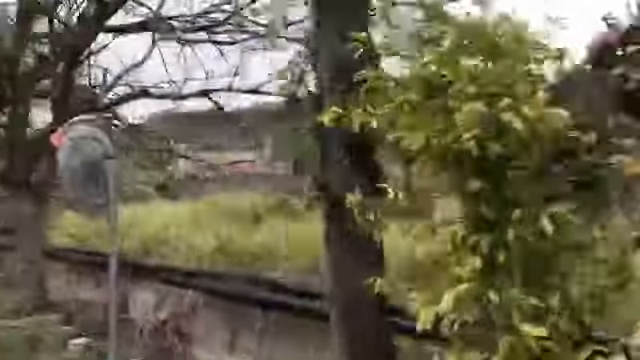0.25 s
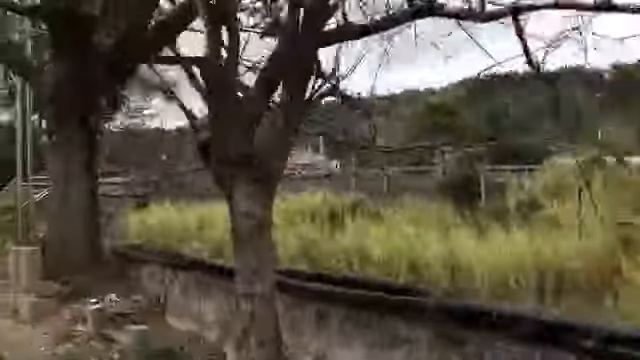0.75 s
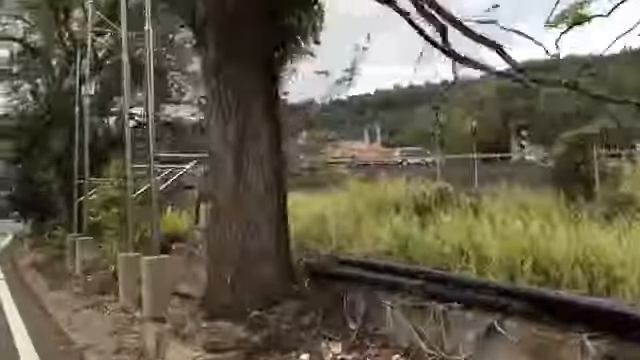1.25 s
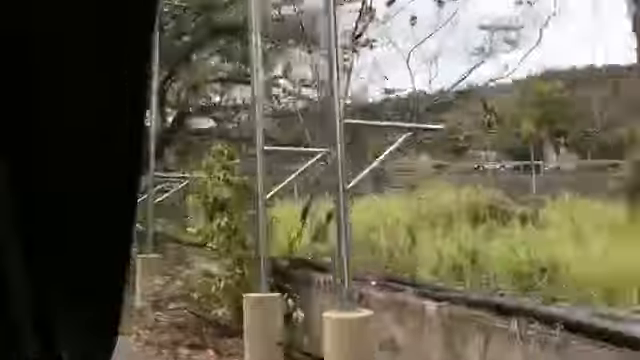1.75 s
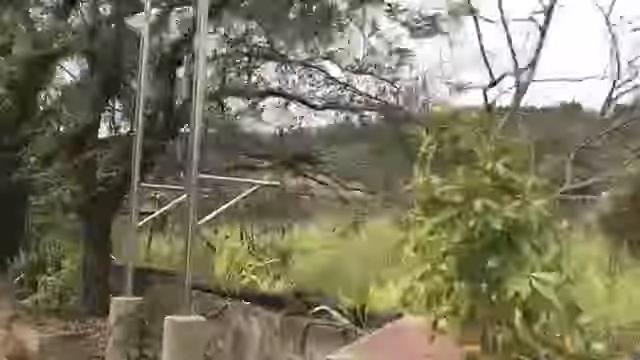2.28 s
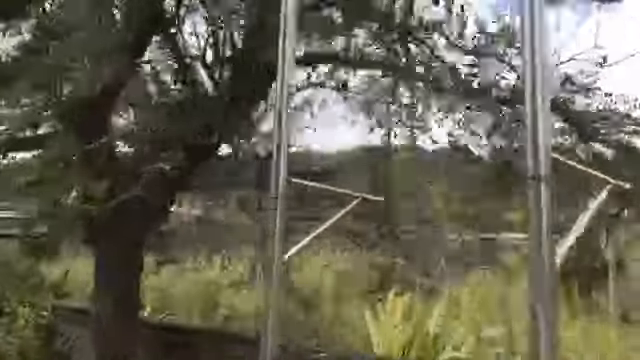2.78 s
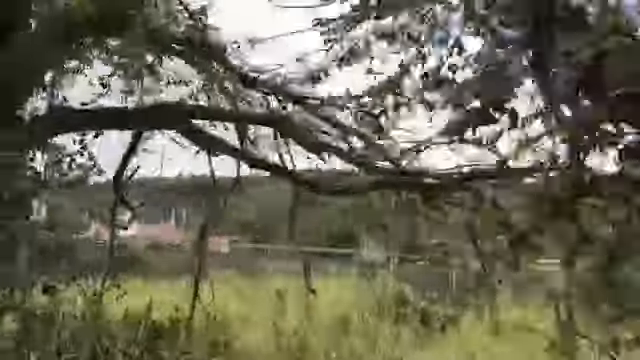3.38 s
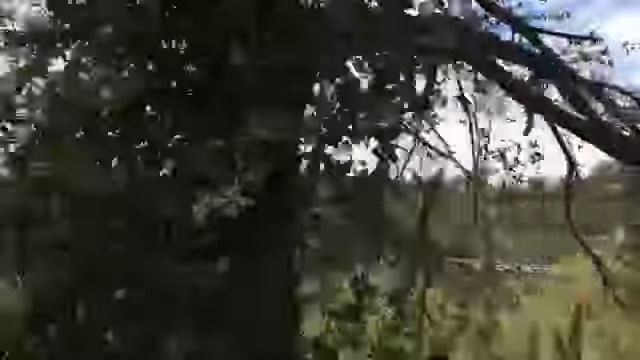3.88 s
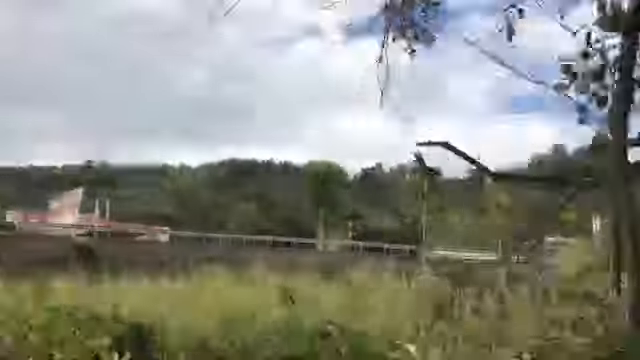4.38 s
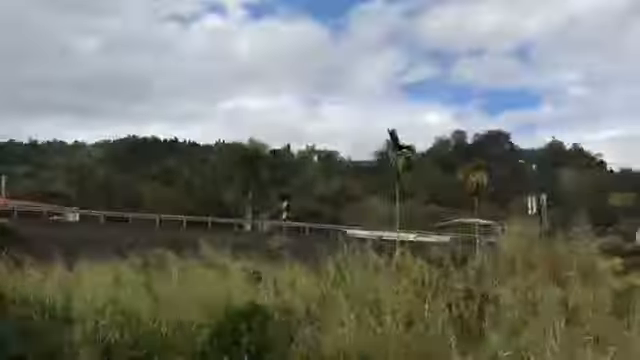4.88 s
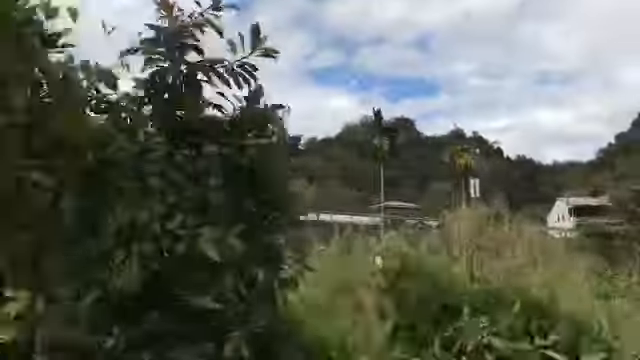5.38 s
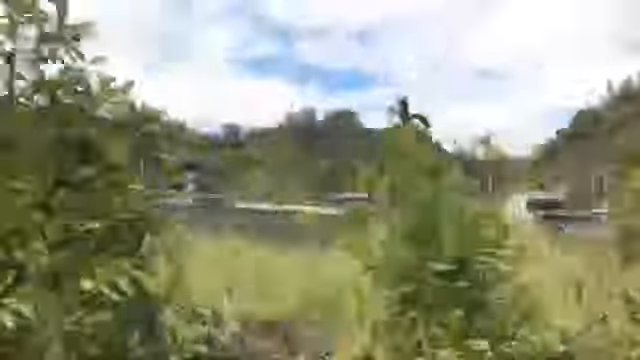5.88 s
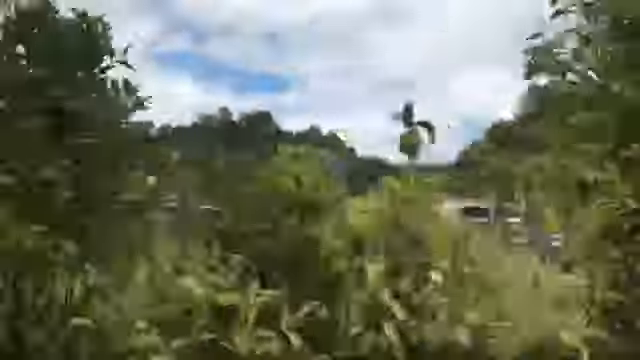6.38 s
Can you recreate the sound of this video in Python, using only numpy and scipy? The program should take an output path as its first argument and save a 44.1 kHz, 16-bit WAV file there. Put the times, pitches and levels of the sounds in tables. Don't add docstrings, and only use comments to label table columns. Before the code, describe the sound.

Very close, overloaded wind noise on a phone held out of a car: ragged tearing bursts over lumpy rumble, sharpest at first, then duller and more thudding. A calmer middle uncovers steady road roar with tyre hum, hiss and faint high insects swelling in passing. Scattered heavy puffs lead to a final burst of violent buffeting, cut off while still blowing.

```python
import sys
import numpy as np
from scipy import signal
from scipy.fft import rfft, irfft
from scipy.io import wavfile
from scipy.ndimage import uniform_filter1d, minimum_filter1d

SR = 44100
rng = np.random.default_rng(int(sys.argv[2]) if len(sys.argv) > 2 else 0)


def waveform_to_disk(signal):
    frames = np.transpose(np.atleast_2d(signal))
    scaled = np.clip(frames, -1, 1) * 32767
    samples = np.round(scaled).astype(np.int16)
    wavfile.write(sys.argv[1], SR, samples)


def field_ratio(decibels):
    return 10 ** (np.asarray(decibels, dtype=float) / 20)


N = 292824
TIME = np.arange(N) / SR


def evened(x):
    return x / np.sqrt(np.mean(x ** 2) + 1e-20)


def coloured_noise(points):
    hz, db = np.transpose(points)
    f = np.fft.rfftfreq(N, 1 / SR)
    weight = field_ratio(np.interp(np.log(f + 1), np.log(hz), db))
    return evened(irfft(rfft(rng.standard_normal(N)) * weight, N))


def curve(rows):
    s, db = np.transpose(rows)
    return np.interp(TIME, s, db)


def lumps(hz):
    spare = SR // 2
    low_pass = signal.butter(2, hz, fs=SR, output="sos")
    smooth = signal.sosfiltfilt(low_pass, rng.standard_normal(N + 2 * spare))
    return evened(smooth[spare:-spare])


def fuzzy(hz, width_hz):
    pitch_hz = hz * (1 + .02 * np.tanh(lumps(1.5)))
    turn = np.exp(2j * np.pi * np.cumsum(pitch_hz) / SR)
    return evened((turn * (lumps(width_hz) + 1j * lumps(width_hz))).real)


def add(mix, s, sound):
    part = mix[max(round(s * SR), 0):][:len(sound)]
    part += sound[:len(part)]


def push(db, ms):
    size = round(max(ms, 1.5) * SR / 1000)
    swing_back = rng.uniform(.5, .9)
    bump = np.r_[np.hanning(size), -swing_back * np.hanning(size + size // 2)]
    return field_ratio(db) * rng.choice([-1, 1]) * bump


# (time [s], gain [dB])
GAIN = [(0, -3.5), (.36, -5.5), (.42, -7.5), (1.55, -7), (1.65, -9.5), (2.72, -7), (3.05, 0.5), (3.55, 0),
        (3.9, -0.5), (4.3, 0.5), (5.1, -0.5), (5.68, 0), (5.85, -4.5), (6.64, -7.5)]


def background_gain():
    return curve(GAIN)


# (frequency [Hz], level per Hz [dB])
ROAR = [(200, -15), (350, -2), (500, -18.5), (800, -11.5), (1200, -6.5), (1600, -13), (2000, -13.5),
        (2800, -24.5), (4000, -62)]
# (frequency [Hz], level against the roar [dB])
TREAD = [
    (600, -11),
    (960, -12.5),
    (1430, -14),
    (1790, -15.5),
]


def road():
    return coloured_noise(ROAR) + sum(field_ratio(db) * fuzzy(hz, 16) for hz, db in TREAD)


# (frequency [Hz], level per Hz [dB])
HISS = [(1200, -1), (2000, -5), (2800, -6), (3300, -7), (4200, -8), (5000, -13.5), (6300, -13),
        (7500, -20.5), (9300, -21), (10400, -26.5), (12500, -22.5), (15600, -26), (16000, -67.5)]


def hiss(since_switch):
    air = coloured_noise(HISS)
    return air + 2.45 * (since_switch < 0) * np.gradient(air)


# (time nearest [s], span [s], level [dB])
INSECTS = [
    (4.4, 0.41, -1.5),
    (5.15, .28, -0.5),
]


def insects():
    near_db, far_db = -52, -9
    away = 1 - sum(field_ratio(db) * np.exp(-((TIME - s) / span) ** 2) for s, span, db in INSECTS)
    level_db = near_db + far_db * away + background_gain()
    return fuzzy(3180, 140) * field_ratio(level_db + .6 * lumps(2.3))


def ground():
    switch_s, switch_db, recovery_s = 3.07, -6.5, 0.18
    gain_db = background_gain()
    since = TIME - switch_s
    dip_db = switch_db * (since > 0) * np.exp(-np.maximum(since, 0) / recovery_s)
    drift_db = .6 * lumps(5)
    roar_db = -33 + 4.3 * gain_db - 9.0 + 0.9 * dip_db + drift_db
    hiss_db = -51 + gain_db + 6.5 + dip_db + drift_db
    return road() * field_ratio(roar_db) + hiss(since) * field_ratio(hiss_db) + insects()


# (time [s], flow level [dB])
STREAM = [(0, -12), (.18, -14), (.4, -16), (.85, -16.5), (1.42, -15), (1.65, -17.5), (1.86, -24.5),
          (2.05, -19.5), (2.3, -20.5), (2.85, -23.5), (3.12, -33.5), (3.45, -29), (4.6, -28), (5.22, -23.5),
          (5.65, -30), (5.8, -17.5), (6.17, -22.5), (6.64, -23)]


def flow():
    flow_db = curve(STREAM)
    return flow_db, -27.5 + 1.576 * (flow_db + 20)


# (frequency [Hz], level per Hz [dB])
CRACKLE = [(100, -3), (300, -2.5), (600, -5), (1000, -11), (1500, -19.5), (2200, -30), (3500, -47.5),
           (9000, -110)]


def crackle_noise():
    return coloured_noise(CRACKLE)


# (frequency [Hz], level per Hz [dB])
EDGE = [(600, -12.5), (1200, 1), (2000, -4), (3000, -12), (4500, -22.5), (7000, -39.5), (11000, -50),
        (16000, -81)]


def edge_noise():
    return coloured_noise(EDGE)


def unrest(rows):
    s, db = rows.T[:2]
    power = np.bincount((s * SR).astype(int), field_ratio(2 * db), N)[:N]
    near, slow = (signal.oaconvolve(power, np.hanning(size) / size, "same") + 2e-7
                  for size in (2201, 13001))
    return np.clip(10 * np.log10(near / slow), -14, 5)


# (frequency [Hz], level per Hz [dB])
RUMBLE = [(15, -47.5), (25, 0.5), (75, -3), (97, -7), (227, -11.5), (260, -15.5), (600, -29.5),
          (780, -62.5), (1320, -120)]


def stream(rows):
    rumble_db, small_db = flow()
    lump = np.tanh(lumps(23)) * np.clip((rumble_db + 46.5) / 22, .2, 1)
    stir_db = unrest(rows)
    rumble = coloured_noise(RUMBLE) * field_ratio(rumble_db - 0.5 + 6.3 * lump + 0.21 * stir_db)
    flicker_db = 4.55 * lumps(110)
    small = crackle_noise() * field_ratio(flicker_db)
    ticks = edge_noise() * field_ratio(1.58 * flicker_db - 26.0)
    return rumble + (small + ticks) * field_ratio(small_db - 8.5 + 8.5 * lump + 0.1 * stir_db)


# (time at the centre [s], crackle level [dB], sharp edge against crackle [dB], pressure push [dB])
HEAD_ON = [(.052, -9, -18.5, -6), (0.157, -15.5, -17, -8), (.257, 0.5, -16, -6.5), (0.282, -11.5, -31, -27),
           (.319, -13, -19, -16), (0.36, -2, -10, -2), (.398, -11, -20.5, -10), (.448, -9.5, -15.5, -15),
           (0.532, -14, -13, -7), (.628, -11, -10, -4), (.662, -7.5, -24, -15), (.706, -8.5, -17.5, -5),
           (0.751, -5, -23.5, -2.5), (0.831, -10, -14.5, -9.5), (.934, -10.5, -21, -21),
           (1.005, -11.5, -21, -17), (1.03, -8, -11.5, -15), (1.093, -4, -17.5, -6),
           (1.152, -16.5, -12.5, -27), (1.214, -5.5, -14, -15), (1.253, -3, -18.5, -10),
           (1.296, -19, -11, -10), (1.319, -5.5, -14.5, -14), (1.368, -15, -13, 1), (1.404, 0.5, -12.5, 1),
           (1.437, -9, -17, 0), (1.48, -6.5, -17.5, 2), (1.533, -13.5, -22, -2), (1.58, -14, -19, -8),
           (1.615, -8.5, -22.5, -4.5)]
TURNING = [(1.683, -21, -36, -21), (1.727, -7, -41, -7), (1.783, -14.5, -20, -6), (1.822, -7, -20.5, -19),
           (1.893, -22, -32, -6), (1.911, -17, -35, -30), (1.956, -14.5, -36, 1), (1.967, -6, -36, -2),
           (2.01, -8, -23, -5), (2.061, -3.5, -19, 3.5), (2.108, -15.5, -25, 0), (2.144, -14, -12, -1),
           (2.201, -12, -26, -13), (2.232, -15, -27, -1), (2.254, -14, -41, -24), (2.284, -4.5, -29, -9),
           (2.3, -9, -45, -3), (2.354, -8.5, -16.5, -2.5), (2.425, -17, -35, -4), (2.455, -22, -34, -20),
           (2.512, -10.5, -44, -9.5), (2.58, -4.5, -20.5, -0.5), (2.652, -10.5, -26, -1),
           (2.662, -9.5, -30, -17), (2.713, -6.5, -40, -14), (2.773, -15, -39, -3.5),
           (2.814, -11.5, -39, -1.5), (2.829, -7.5, -36, -4), (2.928, -19, -36, -1.5),
           (2.966, -12.5, -19, 3.5)]
SIDE_ON = [(4.087, -21.5, -42, -6.5), (4.658, -22, -33, -6), (4.857, -12.5, -25.5, 7),
           (4.896, -37, -31, -5.5), (4.946, -8, -21, 8.5), (5.009, -19.5, -32, -1.5),
           (5.116, -30, -19, 0.5), (5.182, -30, -17, -6.5), (5.198, -22.5, -22, -5),
           (5.222, -12.5, -32, 0.5), (5.315, -15.5, -46, -4.5), (5.395, -20.5, -36, -3.5),
           (5.462, -19.5, -36, 4), (5.511, -20.5, -32, -2.5), (5.575, -20.5, -35, -3.5),
           (5.591, -24.5, -33, -2.5), (5.045, -28, -28, -19), (5.248, -22.5, -35, -12),
           (5.342, -27, -25, -3.5)]
LAST_GUST = [(5.726, -1, -23, 9), (5.773, -23, -29, -1), (5.794, -9.5, -17.5, 5), (5.824, -5, -23, 4),
             (5.857, -15, -41, -9), (5.875, -14.5, -20.5, 3), (5.913, -18, -33, 0),
             (5.963, -22.5, -32, 3.5), (6.006, -5.5, -22, 4), (6.044, -13, -23, -3.5),
             (6.084, -12.5, -24, 3.5), (6.186, -29, -26, -16), (6.217, -8.5, -16.5, 3),
             (6.268, -5.5, -30, -2.5), (6.324, -16, -37, 0.5), (6.422, -21, -35, 2),
             (6.435, -6.5, -18.5, 2.5), (6.486, -3, -25, -0.5), (6.521, -10.5, -23, 1),
             (6.556, -15.5, -38, -15), (6.582, -9.5, -43.5, -4.5), (6.629, -4, -17, 14),
             (6.638, -5.5, -33, 1)]


def wakes(strong):
    n = len(strong)
    side = np.where(rng.random(n) < .33, -1, 1)
    delay_s = side * rng.uniform(7.5, 13, n) / 1000
    wake = strong + np.c_[delay_s, rng.uniform(-14, -7, n), rng.uniform(-13, -4, n),
                          -9.5 + rng.uniform(-4.25, 4.25, n)]
    return wake[wake[:, 0] < N / SR]


def strays():
    gap_s = .032
    n = int(N / SR / gap_s)
    s = (np.arange(n) + rng.random(n)) * gap_s
    facing = 0.32 * (s < .85) + (s > .85) * (s < 1.66)
    db = flow()[1][(s * SR).astype(int)] + 5.5 * facing - 3.5 + rng.uniform(-2.5, 2.5, n)
    edge_db = -26 + 9.5 * facing + rng.uniform(-6, 6, n)
    return np.c_[s, db, edge_db, db + 4.5]


def bursts():
    strong = np.concatenate([HEAD_ON, TURNING, SIDE_ON, LAST_GUST])
    rows = np.concatenate([strong, wakes(strong), strays()])
    softness = np.clip(-rows[:, 1] / 12, .2, 1)
    shortest_ms, longest_ms = 3.25, 7.6
    return np.c_[rows, shortest_ms + (longest_ms - shortest_ms) * rng.random(len(rows)) * softness]


def eddies(rows):
    out, t = np.zeros(N), np.arange(-500, 2100) / SR
    ragged = field_ratio(6.05 * np.tanh(lumps(230)))
    tear, sharp = crackle_noise() * ragged, edge_noise() * ragged
    for k, (s, db, edge_db, push_db, ms) in enumerate(rows):
        u = t / (np.clip(ms, 1.5, 10) / 1000)
        core = np.exp(-(u / np.where(u < 0, .46, .42)) ** 2)
        trail = (t > 0) * (1 - np.exp(-(t / 0.0021) ** 2)) * np.exp(-t / 0.0053)
        body = core + 0.38 * trail
        spike = core ** 2.3
        edge_db = edge_db - max(-26.5 - db, 0) * 0.45
        layers = (tear, db + 0.5, body, core), (sharp, db + edge_db + 7.0, spike, spike)
        for noise, level_db, shape, top in layers:
            part = noise[k * 1500 % (N - 2601):][:len(t)]
            even = np.linalg.norm(top) / np.linalg.norm(top * part)
            add(out, s + t[0], field_ratio(level_db) * shape * part * even)
        add(out, s - .001, push(push_db - 1.5, 0.765 * ms))
    return out


# (time [s], peak level [dB], push width [ms])
PUSHES = [
    (3.377, -14, 6.6),
    (3.626, -13, 3.6),
    (3.801, -12, 8.3),
    (3.877, -16, 4.3),
    (4.064, -15, 7.3),
    (4.488, -9.5, 4.7),
    (4.52, -15, 4.2),
    (4.731, -13.5, 5.7),
    (4.785, -10, 4.5),
    (4.92, -7.5, 3.1),
]


def pushes():
    out = np.zeros(N)
    for s, db, ms in PUSHES:
        add(out, s, push(db - 0.5, ms))
    return out


def scene():
    rows = bursts()
    return (ground() + stream(rows) + eddies(rows) + pushes())[None]


def top_cut(x):
    return signal.sosfilt(signal.butter(12, 15800, fs=SR, output="sos"), x)


def record(dry):
    cut = signal.sosfilt(signal.butter(6, 46.0, "high", fs=SR, output="sos"), dry)
    room = np.minimum(.99 / (abs(cut) + 1e-9), 1)
    gain = uniform_filter1d(minimum_filter1d(room, size=81), size=41)
    return top_cut(cut * gain)


dry = scene()
out = record(dry)
waveform_to_disk(out)
```